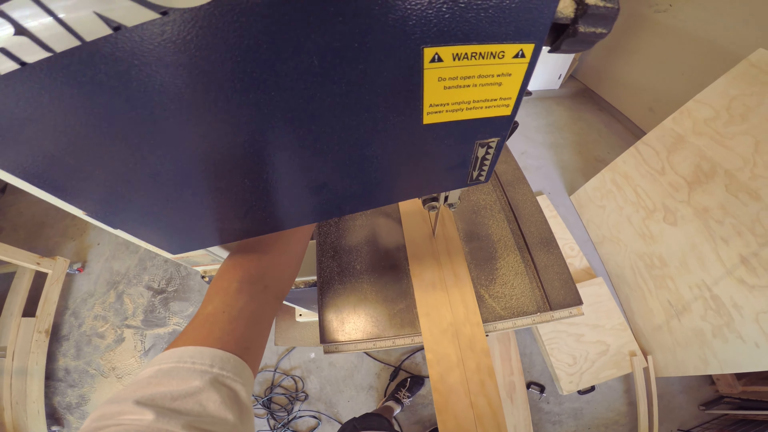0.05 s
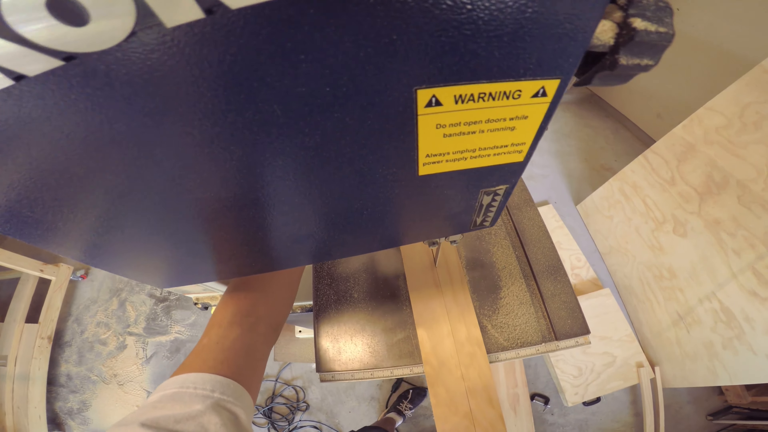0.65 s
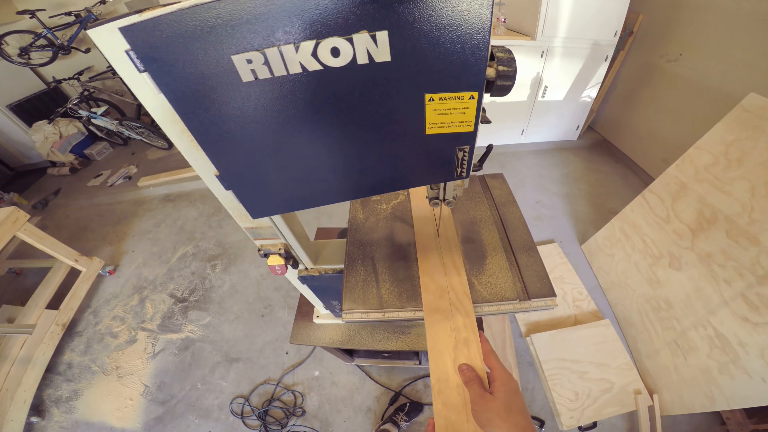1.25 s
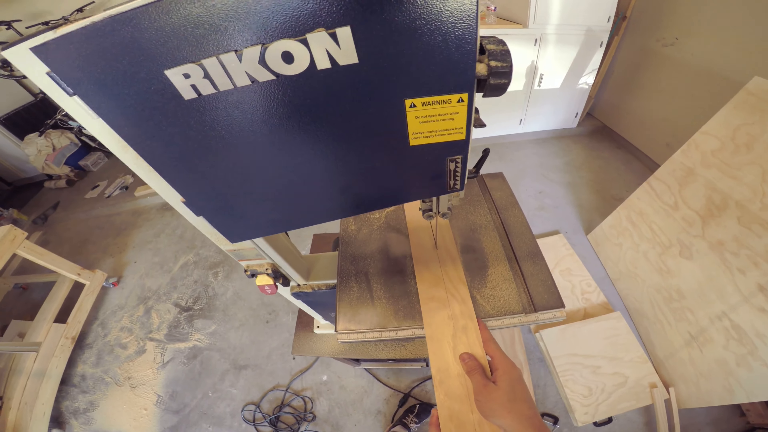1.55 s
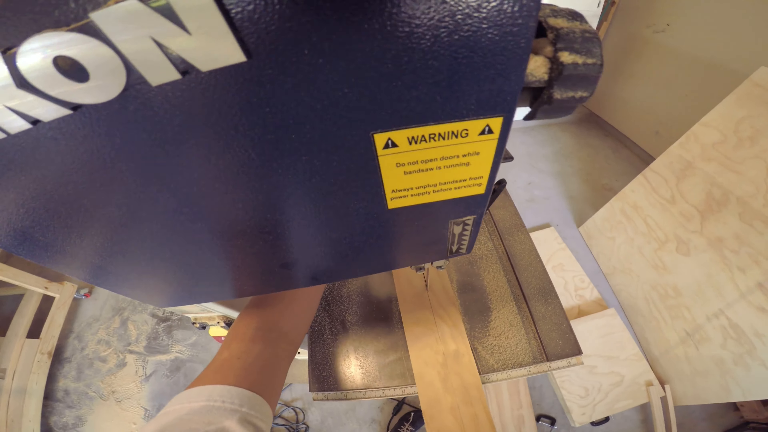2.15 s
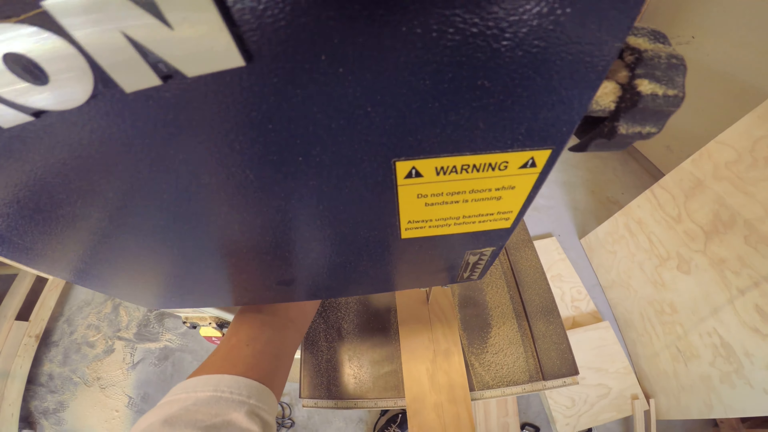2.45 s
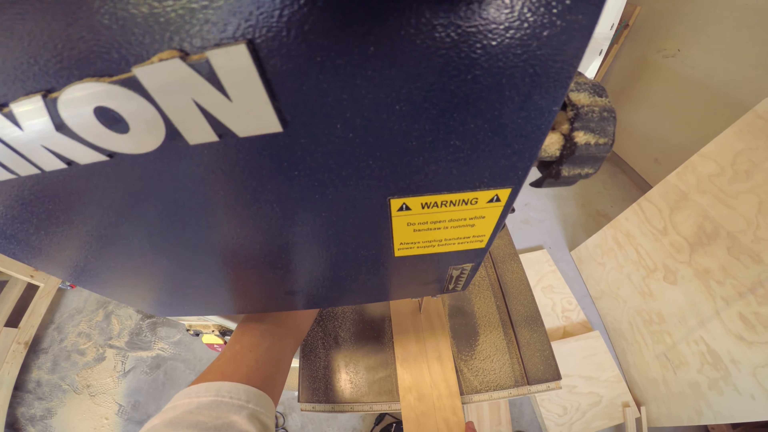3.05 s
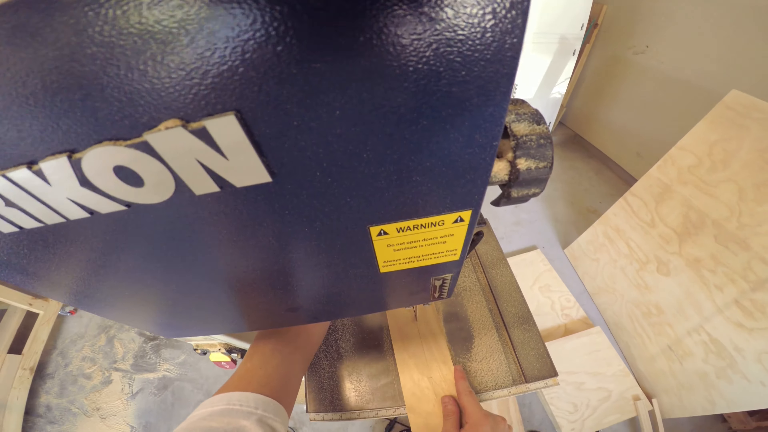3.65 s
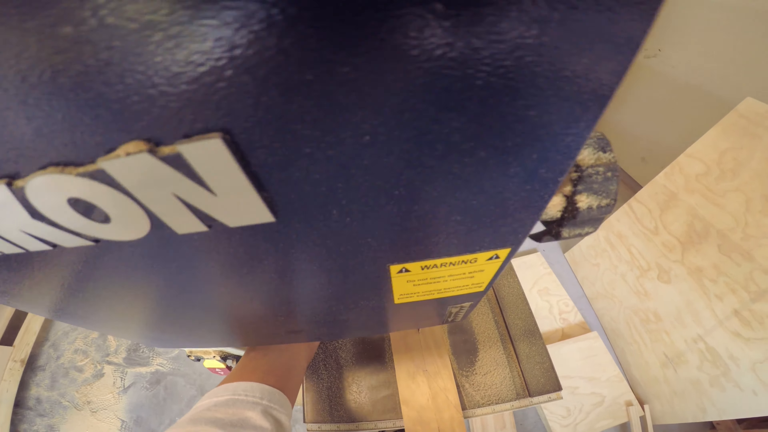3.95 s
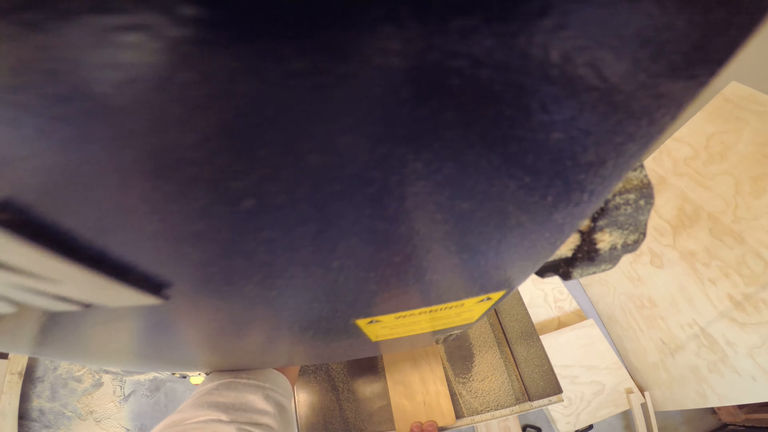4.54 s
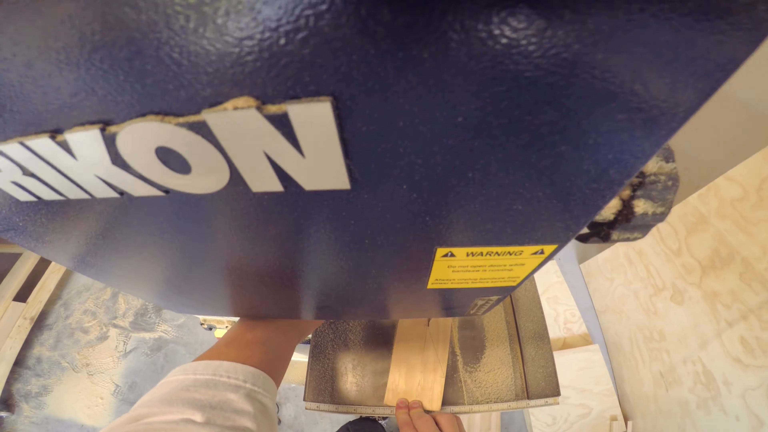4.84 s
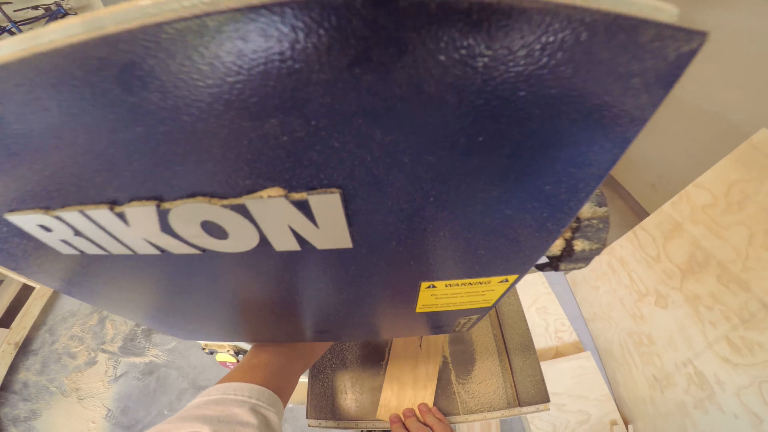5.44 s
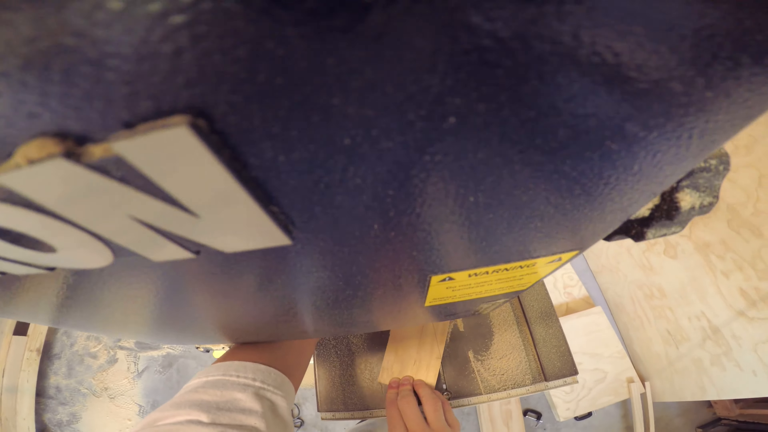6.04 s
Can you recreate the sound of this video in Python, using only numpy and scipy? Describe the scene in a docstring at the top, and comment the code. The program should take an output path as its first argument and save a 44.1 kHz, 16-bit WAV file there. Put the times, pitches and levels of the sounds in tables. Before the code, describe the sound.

A bandsaw rasps through a thin board at close range, with a piercing, wavering whine and brief squeaks.

```python
"""In a workshop, just above its upper wheel cover, a bandsaw is heard ripping a thin board.
The teeth rasp through the wood and ring the saw's frame and table; the blade sizzles, and brief squeaks
come and go. A piercing whine sits near 4 kHz. The cut drags the motor's speed down; whenever the feed
(the push on the board) eases, the tones glide up and back, and the whine buzzes or cuts out.
A low hum swells briefly three times, with a few faint knocks between."""
import sys
import numpy as np
from scipy import signal
from scipy.fft import rfft, irfft
from scipy.io import wavfile
from scipy.ndimage import uniform_filter1d

SR = 44100
rng = np.random.default_rng(int(sys.argv[2]) if len(sys.argv) > 2 else 0)


def to_wav(sig):
    """Store sig (one row per channel, or 1-D mono) as 16-bit WAV at the path in sys.argv[1].

    Samples outside -1..1 are clipped; the rate is SR.
    """
    pcm = np.clip(np.atleast_2d(sig), -1, 1) * 32767
    pcm = np.round(pcm).astype(np.int16)
    wavfile.write(sys.argv[1], SR, pcm.T)  # frames by channels


N = 277389
TIME, FREQS = np.arange(N) / SR, np.fft.rfftfreq(N, 1 / SR)


def amp(db):
    """Turns decibels into a gain."""
    return 10 ** (np.asarray(db) / 20)


def unit(x):
    """Scales a signal to an average (rms) size of one."""
    return x / np.sqrt(np.mean(abs(x) ** 2) + 1e-20)


def follow(rows):
    """Joins a table's points over time: one curve for each column after the first."""
    times, *columns = np.transpose(rows)
    return np.array([np.interp(TIME, times, column) for column in columns])


def across(points):
    """Joins a table's points over frequency."""
    hz, value = np.transpose(points)
    return np.interp(np.log(FREQS + 1), np.log(hz + 1), value)


def peak(hz, width):
    """A resonance: a gain of one at its centre, less on either side."""
    return 1 / (1 + (2 * (FREQS - hz) / width) ** 2)


def colour(x, gain):
    """Gives each frequency its own gain, then scales the sound to size one."""
    return unit(irfft(rfft(x) * gain, N))


def noise():
    """White noise."""
    return rng.standard_normal(N)


def wander(rate_hz):
    """Smooth random motion, up to about the given rate."""
    return colour(noise(), np.exp(-np.minimum(FREQS / rate_hz, 9) ** 2))


def swirl(rate_hz):
    """Smooth random motion in both size and phase."""
    return unit(wander(rate_hz) + 1j * wander(rate_hz))


def swell(middle, length):
    """A smooth rise and fall around one moment."""
    return np.exp(-np.minimum((2 * (TIME - middle) / length) ** 2, 20))


def pulses(cycles):
    """One click at every whole cycle, shared between two samples."""
    samples_away = abs(cycles - np.round(cycles)) / np.gradient(cycles)
    return unit(np.maximum(1 - samples_away, 0))


# when the feed eases: start t/s, end t/s, change in the whine's octave/dB
FEED_EASES = [(0.417, 0.529, -4.5), (0.98, 1.17, 6), (1.53, 1.611, 4.5), (1.774, 1.958, 0),
              (2.054, 2.112, -6), (2.224, 2.303, 4.5), (2.679, 2.753, 0.5), (3.485, 3.558, -1),
              (3.937, 4.005, 0), (4.537, 4.658, 3), (4.744, 4.82, 5), (5.276, 5.42, 3), (5.745, 5.928, 1.5)]
def feed_eases(inertia_s=0.015):
    """One curve per easing, from 0 (cutting) to 1 (running free); inertia rounds the edges."""
    def settle(moment):
        return np.exp(-np.maximum(TIME - moment, 0) / inertia_s)
    return np.array([settle(end) - settle(start) for start, end, _ in FEED_EASES])


# turns per second while the motor is cutting: t/s, f/Hz
CUTTING_SPEED = [(0, 183.0), (0.16, 183.4), (0.28, 181.5), (0.44, 183.3), (1.18, 182.5), (1.24, 180.3),
                 (1.29, 182.2), (1.49, 181.1), (1.6, 183.3), (2.04, 180.8), (2.14, 184.2), (2.48, 182.7),
                 (2.72, 183.4), (2.785, 179.5), (2.83, 183), (3.52, 183.0), (3.62, 182.3), (3.76, 183.9),
                 (4.16, 183.8), (4.4, 185.2), (4.86, 185), (5.04, 182.4), (5.1, 185), (5.48, 183.4),
                 (5.84, 185.8), (6.29, 184.6)]
def motor_turns(free, idle_hz=187.64):
    """Counts the motor's turns; it speeds up when the wood stops holding it back."""
    speed_hz = (1 - free) * follow(CUTTING_SPEED)[0] + free * idle_hz + 0.2026 * wander(20.97)
    return np.cumsum(speed_hz) / SR


def bites(teeth, click, puff_depth=0.028, uneven_db=2, flicker_db=1.0):
    """Each tooth strikes the wood and tears off a puff of chips; no two bite alike."""
    chips = unit((1 + puff_depth * np.cos(2 * np.pi * teeth)) * noise())
    strikes = click * pulses(teeth) * amp(uneven_db * wander(110))
    return (chips + strikes) * amp(flicker_db * wander(27.0))


# tone colour of the ringing frame: f/Hz, relative level/dB
FRAME_COLOUR = [(400, -82), (620, -43.5), (1250, -26), (1310, -27.5), (1560, -0.5), (1600, -11), (1690, -1),
                (1870, -3), (1990, -18.5), (2100, -31), (2730, -34), (4620, -120)]
# tone colour of the ringing saw table: f/Hz, relative level/dB
TABLE_COLOUR = [(2050, -18.5), (2220, -3.5), (3400, -4.5), (3800, -5.5), (4300, -1), (4550, -9.5),
                (6000, -26)]
# tone colour of the rasping teeth: f/Hz, relative level/dB
RASP_COLOUR = [(3500, -44), (4600, -9), (5000, -3), (5600, 0), (6200, 8), (7350, 1.5), (7800, 1),
               (8600, 2.5), (9700, -4.5), (12000, -12)]
# where the blade's sizzle is strongest: f/Hz, width/Hz, relative level/dB
SIZZLE_PEAKS = [(10770, 450, -2), (11595, 260, 6)]
# how the cut grows and fades: t/s, then relative level/dB of frame, table, rasp and sizzle
CUT_LEVELS = [(0.0, -43, -39, -33.5, -32.5), (0.59, -41.5, -39, -33, -33), (0.94, -36, -36, -31, -21.5),
              (1.03, -43.5, -32, -31.5, -23), (1.25, -46, -38.5, -36, -36), (1.5, -48.5, -37, -35.5, -30.5),
              (2.05, -41.5, -35.5, -31, -31), (2.34, -39, -34.5, -33, -31.5),
              (2.63, -39.5, -37, -30, -26.5), (3.22, -42, -37.5, -33.5, -32.5),
              (3.36, -41, -36.5, -31, -27), (3.95, -43, -37.5, -31.5, -28),
              (4.57, -36.5, -38.5, -29.5, -27), (4.72, -42, -39.5, -33.5, -43),
              (5.41, -44.5, -41.5, -35, -42), (5.85, -41.5, -36, -29.5, -29), (6.0, -37, -34.5, -27, -24),
              (6.29, -39.5, -38.5, -30.5, -23)]
def cut(teeth, free, frame_db=-5.0, table_db=0.7, rasp_db=-0.67, sizzle_db=-7.0, free_sizzle_db=-5):
    """The bites ring the frame and the table, rasp in the wood and make the blade sizzle."""
    # the sheet steel rings weakly at countless pitches, which ripples the tone colour
    steel = amp(3 * wander(150)[:len(FREQS)] / (1 + (FREQS / 9000) ** 2))
    frame = colour(bites(teeth, click=0.21), steel * amp(across(FRAME_COLOUR)))
    table = colour(bites(teeth, click=0.21), steel * amp(across(TABLE_COLOUR)) * (FREQS > 1300))
    rasp = colour(bites(teeth, click=0.12), steel * amp(across(RASP_COLOUR)) * (FREQS > 2200))
    bright = sum(amp(db) * peak(hz, width) for hz, width, db in SIZZLE_PEAKS)
    sizzle = colour(bites(teeth, click=0, flicker_db=2.0), bright * (FREQS > 5000))
    layers = [amp(frame_db) * frame, amp(table_db) * table, amp(rasp_db) * rasp,
              amp(sizzle_db + free_sizzle_db * free) * sizzle]
    return (amp(follow(CUT_LEVELS)) * layers).sum(0)


# how the hiss grows and fades: t/s, relative level/dB
HISS_LEVELS = [(0, -38.5), (.95, -40), (1.35, -42.5), (2, -37.5), (3.2, -39.5), (3.45, -32), (3.8, -37.5),
               (4.53, -37.5), (4.85, -35), (5.4, -37), (5.85, -38), (6.0, -35), (6.29, -35)]
# tone colour of the hiss: f/Hz, relative level/dB
HISS_COLOUR = [(8500, -13), (10000, -6.5), (13500, 9), (15700, 6.5)]
def chip_hiss(teeth, gain_db=6.0):
    """The torn-off chips make a fine, very high hiss."""
    hiss = colour(bites(teeth, click=0, flicker_db=0.9), amp(across(HISS_COLOUR)) * (FREQS > 7000))
    return amp(gain_db + follow(HISS_LEVELS)[0]) * hiss


def table_ring(strikes, free, hz=2987, width_hz=200, level_db=-46, free_db=4.5):
    """The saw table sings at one pitch throughout, louder when the feed eases."""
    return amp(level_db + free_db * free) * colour(strikes, peak(hz, width_hz))


def tone(turns, multiple, db, sway, fuzz, buzz=0):
    """A tone at a multiple of the motor's speed: sway wavers it, fuzz roughens it, buzz throbs it."""
    size = 1 + sway * swirl(21.7) + fuzz * swirl(93)
    size = size + 0.19 * np.array([[1], [-1]]) * swirl(3.0)  # left and right fade differently
    angle = 2 * np.pi * turns
    throb = np.exp(buzz * (np.cos(angle) + 0.85j * np.sin(angle)))  # once a turn
    throb /= np.sqrt(np.i0(2 * buzz))  # keeps the power steady
    return np.sqrt(2) * amp(db) * (unit(size) * throb * np.exp(1j * multiple * angle)).real


# the whine and its overtones: multiple of the speed (gets rounded), change when free/dB, sway, buzz
WHINE_TONES = [(22, -0.5, 0.076, 0.61), (44, -1.5, 0.31, 0.52), (65.98, -5.5, 0.52, 0.26)]
# one curve per whine tone, as the listener's head moves: t/s, relative level/dB
WHINE_LEVELS = [
    [(0, -37), (0.3, -31.5), (0.6, -36.5), (1.25, -28.5), (1.48, -31.5), (1.66, -38), (2.02, -29.5),
     (2.16, -33), (2.38, -30), (2.78, -31.5), (3.2, -41), (3.6, -30), (3.75, -34), (4.56, -31.5),
     (4.72, -39), (4.93, -30), (5.15, -35.5), (5.27, -33), (5.46, -38.5), (5.65, -32), (5.91, -29),
     (6.29, -37)],
    [(0, -36.5), (0.7, -32.5), (1.0, -44), (1.3, -37.5), (2.36, -34), (2.86, -28.5), (3.2, -32.5),
     (3.4, -28), (3.68, -33.5), (4.1, -30), (4.7, -39.5), (5.28, -38.5), (5.45, -43.5), (5.68, -32),
     (6.29, -40)],
    [(0, -37), (0.84, -32.5), (2.16, -29), (2.44, -34.5), (2.8, -32.5), (3.06, -43), (4.4, -30), (5.7, -35),
     (5.88, -35), (5.98, -26.5), (6.29, -25)],
]
# extra tones beside the whine while cutting: multiple of the speed, relative level/dB
SIDE_PITCHES = [(20, -9.5), (21, -7.5), (23, 0.5), (23.96, 2), (43, -11), (45.03, 1.5), (67, 5)]
# how those side tones grow and fade together: t/s, relative level/dB
SIDE_LEVELS = [(0, -44), (.8, -45), (1.7, -44.5), (2.4, -44), (3.4, -39.5), (4, -41), (4.8, -48.5),
               (5.4, -43), (6, -44), (6.29, -43)]
# the whine cuts out and snaps back: start t/s, end t/s, change/dB
WHINE_CUTOUTS = [(0.44, 0.517, -20), (1.18, 1.224, -7), (1.27, 1.312, -7.5), (1.341, 1.406, -8),
                 (1.538, 1.598, -8), (1.783, 1.964, -17), (2.058, 2.115, -20), (2.262, 2.298, -16),
                 (4.582, 4.68, -8), (4.748, 4.781, -12), (5.081, 5.13, -9), (5.285, 5.431, -7),
                 (5.775, 5.9, -19)]
def saw_whine(turns, eases, gain_db=1.0, fuzz=0.17, free_fuzz=0.33, snap_s=0.012):
    """A piercing whine near 4 kHz follows the saw's speed, buzzing or cutting out at times."""
    free = eases.sum(0)
    steps_db = sum(db * ((TIME > start) & (TIME < end)) for start, end, db in WHINE_CUTOUTS)
    cutout_db = uniform_filter1d(steps_db.astype(float), round(snap_s * SR))
    octave_db = np.array(FEED_EASES)[:, 2] @ eases
    changes_db = [cutout_db, octave_db, 0]
    whine = 0
    for (multiple, free_db, sway, buzz), curve, change_db in zip(WHINE_TONES, WHINE_LEVELS, changes_db):
        level_db = gain_db + follow(curve)[0] + change_db + free_db * free
        whine += tone(turns, round(multiple), level_db, sway, fuzz + free_fuzz * free, buzz * free)
    side_db = follow(SIDE_LEVELS)[0] + cutout_db
    sides = sum(tone(turns, multiple, side_db + db, sway=1.0, fuzz=fuzz) for multiple, db in SIDE_PITCHES)
    return whine + (1 - free) * sides


# the frame's tones: multiple of the speed, relative level/dB when cutting, and when running free
FRAME_TONES = [(8.985, -4.5, -7.5), (9.52, -7, -6), (9.865, -6.5, -30), (11.95, -16, -10),
               (12.6, -12.5, -15), (18, -12, -4), (28.8, -10.5, -11)]
def frame_tones(turns, free):
    """Teeth and bearings ring weak, clean tones in the frame that glide with the motor's speed."""
    frame_db = follow(CUT_LEVELS)[0]
    return sum(tone(turns, multiple, frame_db + cutting + free * (idle - cutting), sway=0.7, fuzz=0.1)
               for multiple, cutting, idle in FRAME_TONES)


# short sounds from the saw: middle t/s, length/s, f/Hz, width/Hz, level/dB
SQUEAKS_AND_RINGS = [(0.44, 0.062, 3420, 253, -36.5), (1.797, 0.011, 2710, 119, -24.5),
                     (1.842, 0.0064, 3400, 300, -32), (1.867, 0.0077, 3450, 250, -28),
                     (1.898, 0.034, 5940, 220, -24), (2.039, 0.026, 5995, 100, -32),
                     (2.08, 0.011, 2800, 247, -31), (2.295, 0.11, 6150, 400, -26.5),
                     (2.268, 0.09, 2980, 500, -39), (4.0, 0.059, 2985, 159.9, -39),
                     (4.452, 0.49, 2980, 89.74, -42), (4.568, 0.019, 2992, 130, -34.5),
                     (4.598, 0.041, 6300, 695, -30), (4.764, 0.037, 6520, 704, -30.5),
                     (4.764, 0.017, 1750, 130, -33.5), (5.144, 0.017, 1774, 130, -29.5),
                     (5.136, 0.009, 3160, 1506, -30.5), (5.215, 0.2, 8380, 400, -37),
                     (5.346, 0.02, 2600, 200, -30.5), (5.312, 0.043, 6320, 500, -31),
                     (5.391, 0.22, 6220, 597, -33), (5.772, 0.066, 6230, 695.5, -28),
                     (5.81, 0.017, 3505, 2207, -31.5), (6.009, 0.1, 8520, 301, -29.5)]
def squeaks(strikes):
    """Brief squeaks, scrapes, knocks, rings and buzzes, each around one pitch."""
    return sum(amp(db) * swell(middle, length) * colour(strikes, peak(hz, width) * (FREQS > 1300))
               for middle, length, hz, width, db in SQUEAKS_AND_RINGS)


# tone colour of the low hum: f/Hz, relative level/dB
HUM_COLOUR = [(30, -11), (100, -12), (200, -1), (500, 0), (900, -5), (1300, -8), (2000, -30)]
# swells of the hum: start t/s, end t/s, start level/dB, end level/dB
HUM_SWELLS = [(0.965, 1.157, -55, -61), (2.06, 2.224, -58.5, -68.5), (6.1, 6.283, -60, -46)]
def low_hum(pulse_hz=97.5, rest_db=-110, rise_db_per_s=600, fall_db_per_s=133):
    """Slightly uneven pulses over a rumble, swelling and fading."""
    cycles = np.cumsum(pulse_hz + 0.337 * wander(5.4)) / SR
    drive = pulses(cycles) + 0.7 * noise()
    gain = amp(rest_db + 5 * wander(14))
    for start, end, first_db, last_db in HUM_SWELLS:
        fade_db = rise_db_per_s * np.maximum(start - TIME, 0) + fall_db_per_s * np.maximum(TIME - end, 0)
        gain += amp(np.interp(TIME, [start, end], [first_db, last_db]) - fade_db)
    return gain * colour(drive, amp(across(HUM_COLOUR)) * (FREQS < 2500))


# faint low knocks: t/s, level/dB
FAINT_KNOCKS = [(1.86, -78), (2.76, -75), (2.939, -88), (3.055, -79), (3.745, -78), (4.345, -77)]
def knocks(length_s=0.072):
    """Short, uneven clusters of dull bumps, coloured like the hum."""
    bumps = sum(amp(db) * swell(middle, length_s) for middle, db in FAINT_KNOCKS)
    uneven = unit(amp(3.8 * wander(35)))
    return bumps * uneven * colour(noise(), amp(across(HUM_COLOUR)) * (FREQS < 700))


def cover_shade(x, start_s=4.2, hz=5300, width_hz=680, share=0.48):
    """The wheel cover comes between the cut and the listener and hides part of the rasp."""
    band_gain = np.exp(-np.minimum(((FREQS - hz) / width_hz) ** 2, 10) ** 2)
    hidden = share * np.clip(20 * (TIME - start_s), 0, 1)
    return x - hidden * irfft(rfft(x) * band_gain, N)


def drift(x, depth_db):
    """Narrow bands swell and fade as the listener moves through the saw's standing waves."""
    spectrum = signal.stft(x, nperseg=1024, noverlap=768)[2]
    patches = rng.standard_normal(spectrum.shape)
    for axis, size in ((0, 4), (1, 18), (1, 12)):  # smooth over frequency, then twice over time
        patches = uniform_filter1d(patches, size, axis)
    gain = unit(amp(depth_db * unit(patches)))
    return signal.istft(spectrum * gain, nperseg=1024, noverlap=768)[1][:N]


def workshop(x, fade_s=0.088):
    """The room adds a short wash of echoes, different on the left and right."""
    t = np.arange(SR // 2) / SR
    tail = rng.standard_normal((2, len(t))) * amp(-60 * t / fade_s) * (t > 0.004)
    return signal.fftconvolve(x[None], tail / np.linalg.norm(tail[0]), axes=1)[:, :N]


# how much louder the left side is: f/Hz, level/dB
LEFT_LOUDER = [(500, -1), (1700, 3.5), (4100, 7.5), (8200, 5), (12000, -3), (15000, 0.5)]
# how far the left side's wave runs ahead: f/Hz, phase/rad
LEFT_AHEAD = [(1700, 0.26), (4200, 0.4), (6100, -1.4), (7400, -1.4), (8200, -1.66), (10200, -2),
              (11500, 0.33)]
def left_and_right(x):
    """The saw reaches the two sides with different level and timing."""
    ratio = amp(across(LEFT_LOUDER)) * np.exp(1j * across(LEFT_AHEAD))
    right = 2 / (1 + ratio)
    return irfft(rfft(x) * np.array([ratio * right, right]), N)


def scene(cut_room_db=-8, whine_room_db=-16, low_room_db=-16.5):
    """One motor speed drives the cut and the tones; all sounds arrive direct and from the room."""
    eases = feed_eases()
    free = eases.sum(0)
    turns = motor_turns(free)
    teeth = 0.9965 * turns  # just under one tooth per turn
    cutting = cover_shade(drift(cut(teeth, free) + chip_hiss(teeth), depth_db=1.9))
    strikes = bites(teeth, click=0.55)
    sawing = cutting + table_ring(strikes, free) + squeaks(strikes)
    singing = saw_whine(turns, eases) + frame_tones(turns, free)
    room = workshop(amp(cut_room_db) * sawing + amp(whine_room_db) * singing.mean(0))
    low = low_hum() + knocks()
    direct = np.array([drift(side, depth_db=0.38) for side in left_and_right(sawing + singing)])
    return direct + room + low + amp(low_room_db) * workshop(low)


def record(dry, top_hz=15780):
    """Takes away the very highest treble."""
    lowpass = signal.firwin(801, top_hz, window=("kaiser", 9), fs=SR)
    return signal.oaconvolve(dry, lowpass[None], "same")


dry = scene()
out = record(dry)
to_wav(out)
```